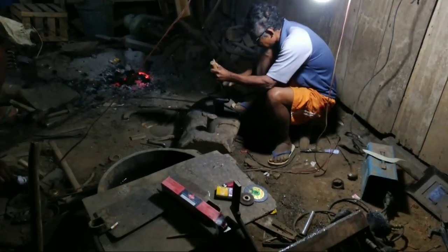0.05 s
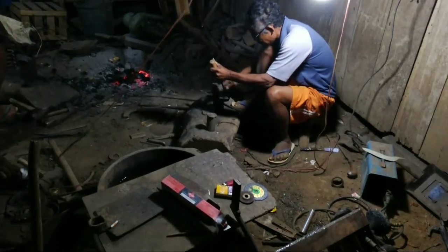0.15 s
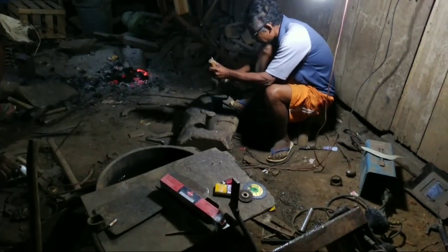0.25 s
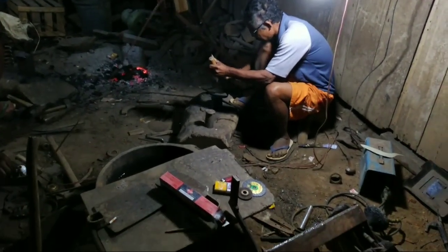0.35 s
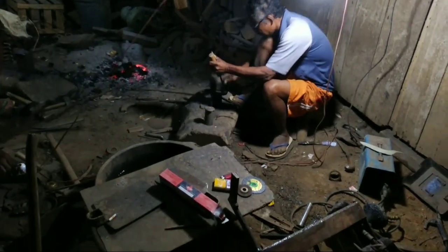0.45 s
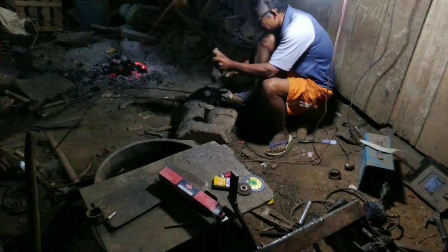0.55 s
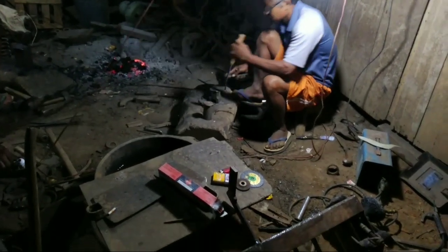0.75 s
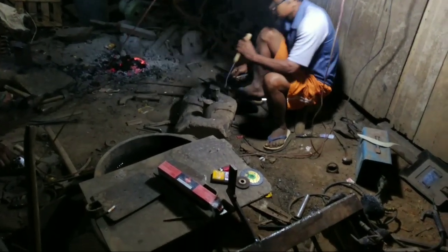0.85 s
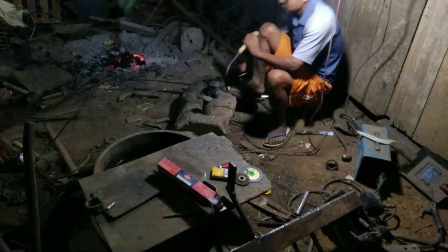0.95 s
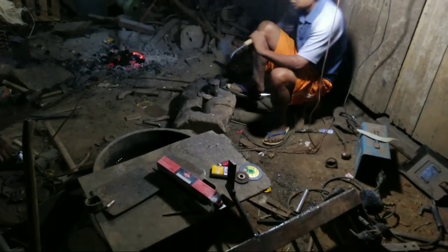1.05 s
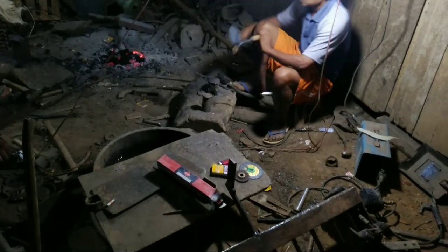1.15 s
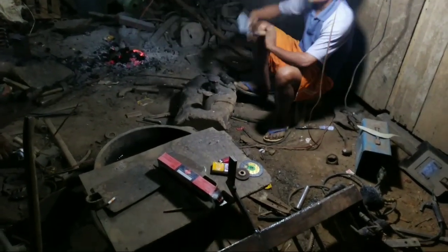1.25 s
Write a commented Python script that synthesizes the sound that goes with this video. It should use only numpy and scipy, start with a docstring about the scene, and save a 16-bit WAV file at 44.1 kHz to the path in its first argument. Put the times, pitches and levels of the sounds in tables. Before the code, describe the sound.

Hammer on hot iron over a small block anvil: a dying blow, two loud cracking strikes with short damped ring, light clicks, then a gritty metallic clank and soft knocks; small workshop, close overloaded microphone.

```python
"""A smith hammers hot iron on a small block anvil, close enough to overload the recorder.
Each blow sums a noise crack, a falling thud, decaying block and anvil partials, and room reflections.
Light clicks are short noise; the hammer put down clanks as partials, grit grains and a hollow note.
Knocks of tools as he gets up are noise bumps with a woody note.
Shaped noise gives the faint hiss with two thin bands and the low rumble of air."""
import sys
import numpy as np
from scipy import signal
from scipy.fft import rfft, irfft
from scipy.io import wavfile

SR = 44100
rng = np.random.default_rng(int(sys.argv[2]) if len(sys.argv) > 2 else 0)


def waveform_to_disk(signal):
    """Save audio, clipped to [-1, 1], as 16-bit WAV at the path in sys.argv[1]."""
    frames = np.transpose(np.atleast_2d(signal))
    scaled = np.clip(frames, -1, 1) * 32767
    samples = np.round(scaled).astype(np.int16)
    wavfile.write(sys.argv[1], SR, samples)


N = 57330
T = np.arange(SR * 3 // 5) / SR  # time axis of one event, s
CLICK_RISE_S, ECHO_RISE_S = 0.00014, 0.0036

# left-right likeness of the sound field: f/Hz, correlation
LIKENESS = [(30, 0.58), (120, 0.68), (350, 0.98), (700, .7), (1400, 0.084), (3000, 0), (15000, 0.022)]


def amp(db):
    """Decibels to gain."""
    return 10 ** (np.asarray(db) / 20)


def read(points, hz):
    """A table's value along a log-frequency axis."""
    f, value = np.transpose(points)
    return np.interp(np.log(hz + 1), np.log(f), value)


def add(mix, s, sound):
    """Mixes a sound in at time s; a negative time leaves only its remainder."""
    at = round(s * SR)
    sound = sound[..., max(-at, 0):]
    part = mix[:, max(at, 0):][:, :sound.shape[-1]]
    part += sound[..., :part.shape[1]]


def pan(db):
    """Left and right gains for a left-right level difference."""
    return amp(np.array([[.5], [-.5]]) * db)


def strike(rise_s, t60):
    """Envelope with a quick rise and an exponential decay, 60 dB in t60 seconds."""
    return (1 - np.exp(-T / rise_s)) * np.exp(-np.log(1000) * T / t60)


def noise(spectrum, size, tilt_db=0):
    """Stereo noise of unit RMS, coloured and partly correlated; tilt in dB per octave above 500 Hz."""
    # level difference: f/Hz, left-right/dB
    balance = [(30, 21), (120, 1.5), (400, 4.5), (700, 2), (1300, 0.5), (2400, 5.5), (4400, 6.5),
               (7000, 3.5), (9500, -12.5), (12000, 2.5), (15000, -3.5)]
    hz = np.fft.rfftfreq(size, 1 / SR)
    a, b = rfft(rng.standard_normal((2, size)))
    same = np.clip(read(LIKENESS, hz), -1, 1)
    z = np.array([a, same * a + np.sqrt(1 - same ** 2) * b]) * pan(read(balance, hz))
    colour_db = read(spectrum, hz) + tilt_db * np.log2(np.maximum(hz, 500) / 500)
    x = irfft(z * amp(colour_db), size)
    return x / np.sqrt(np.mean(x ** 2))


def room(spectrum, rise_s, tilt_db=0):
    """Dense reflections that die away band by band, leaving a faint slower tail."""
    # decay of the room: f/Hz, t60/s
    decay = [(100, 0.32), (400, 0.23), (1000, 0.25), (2800, 0.23), (7000, 0.21), (15000, 0.23)]
    late_db, late_t60 = -24, .5
    hz, t, z = signal.stft(noise(spectrum, len(T), tilt_db), SR, nperseg=256)
    early = np.exp(-np.log(1000) * t / read(decay, hz)[:, None])
    late = amp(late_db) * np.exp(-np.log(1000) * t / late_t60)
    tail = signal.istft(z * (early + late), SR, nperseg=256)[1][:, :len(T)]
    return tail * (1 - np.exp(-T / rise_s))


def mode(hz, rise_s, t60, spread=1):
    """One dying partial; the higher it is, the more reflections make it waver and the right channel lag."""
    waver_depth, waver_per_s = 0.72, 70
    phase = rng.uniform(0, 2 * np.pi)
    lag = spread * np.arccos(np.clip(read(LIKENESS, hz), -1, 1))
    steps = rng.standard_normal((2, 200)) + 1j * rng.standard_normal((2, 200))
    waver = np.array([np.interp(T * waver_per_s, np.arange(len(row)), row) for row in steps])
    depth = waver_depth * spread * hz / (hz + 1000)
    carrier = np.exp(1j * (2 * np.pi * hz * T + phase - np.array([[0], [lag]])))
    tone = (1 + depth * waver) / np.sqrt(1 + depth ** 2) * carrier
    return strike(rise_s, t60) * tone.imag


def blow(level_db, thud_db, tilt_db, body_db, sizzle_db):
    """Crack, thud, the knock of the block, a ring damped by the soft iron, and the room's answer."""
    # crack of the contact: f/Hz, level/dB per Hz
    crack_colour = [(100, 0), (500, -10), (1000, -5), (2000, -4.5), (3000, -0.5), (4500, -12.5),
                    (7500, -11), (10000, -18.5), (15000, -30)]
    # short knock of the anvil block: f/Hz, level/dB, t60/s
    block = [(677, -1.5, 0.04), (737.3, -2, 0.051), (810, -8, .03), (1048, -2, .03), (1145, -1.5, 0.041),
             (2025, -2.5, .04), (3320, -3.5, 0.027)]
    # ring of anvil and iron: f/Hz, level/dB, t60/s
    anvil = [(148.2, -12, .3), (342.5, -0.5, 0.23), (435.2, -4.5, 0.24), (725, -6.5, 0.31), (792, -7, .19),
             (1171, -9.5, 0.24), (1958, -4, 0.26), (2630, -21, 0.2), (2810, 0, 0.21), (2850, -7.5, 0.15),
             (3760, -19, .2), (4310, -3, 0.25), (6640, -12, .15), (9100, -16.5, .22)]
    # the room's answer: f/Hz, level/dB per Hz
    echo_colour = [(50, -12), (130, -14), (300, -4), (520, -3), (720, 1.5), (900, -3.5), (1120, -3),
                   (1330, -7.5), (1700, -3.5), (2000, -6.5), (2300, -4), (3000, -1), (4200, -6), (6800, -8),
                   (9500, -13.5), (11000, -26), (15000, -38.5)]
    crack_db, block_db, thud_base_db, ring_db, echo_db = -1, -1.5, -8.5, -18.5, -8.5
    contact_low_hz = 460  # the contact itself radiates little below this
    sizzle_hz = 10000  # the top-treble change is full from here up

    crack = amp(crack_db) * noise(crack_colour, len(T)) * strike(rise_s=0.00032, t60=0.031)
    body = sum(amp(db) * mode(hz, 0.0014, t60, spread=0.41) for hz, db, t60 in block)
    high_pass = signal.butter(2, contact_low_hz, "high", fs=SR, output="sos")
    contact = signal.sosfilt(high_pass, crack + amp(block_db + body_db) * body)
    push = amp(thud_base_db + thud_db) * thud()
    ring = sum(amp(db + tilt_db * np.log2(hz / 1500)) * mode(hz, 0.001, t60) for hz, db, t60 in anvil)
    ring = amp(ring_db) * pan(1.5) * ring
    bright = [(hz, db + sizzle_db * min(hz / sizzle_hz, 1) ** 2) for hz, db in echo_colour]
    echo = amp(echo_db) * room(bright, ECHO_RISE_S)
    return amp(level_db) * (contact + push + ring + echo)


def thud():
    """A short heavy push whose pitch drops as it passes through the anvil's bed."""
    top_hz, end_hz, fall_s, peak_s = 1482, 70, 0.00482, 0.0056
    hz = end_hz + (top_hz - end_hz) * np.exp(-T / fall_s)
    u = T / peak_s
    cycles = np.cumsum(hz) / SR + rng.random()
    return (u * np.exp(1 - u)) ** 2 * np.sin(2 * np.pi * cycles)


def set_down(clank_db, note_db, note_hz):
    """The steel head clanks, grinds on grit and rings; what it lands on gives a blurred hollow note."""
    # partials of the head: f/Hz, level/dB, t60/s, left-right/dB
    head_modes = [(2550, -3, 0.15, -6), (4610, -24, 0.44, -1), (4920, -19.5, 1, 11), (4900, 4, 0.14, 4),
                  (5210, -23.5, 1, 0), (6150, -6, 0.25, 5), (6900, -22.5, 1, -2), (7980, -18, .25, 2),
                  (8409, -6.5, 0.31, 3), (8930, -18, 0.3, 0), (9380, -3.5, 0.27, -17.5),
                  (9000, -24, 0.2, -12), (10200, -22, 0.098, -9)]
    # clank and grit: f/Hz, level/dB per Hz
    clank_colour = [(100, -8), (350, -9), (700, -2), (1400, -0.5), (2800, 3), (5500, -4.5), (8000, -1),
                    (10300, -0.5), (12000, -12), (15000, -18)]
    # blur of the note: multiple of note_hz, level/dB per Hz
    note_band = [(.4, -37), (.78, -15), (1, 3), (1.2, -3), (1.45, -14.5), (3, -44)]
    head_db, grit_db, clank_room_db, blur_db = -28, -22, -22.5, -9
    clank_rise_s, note_rise_s, note_t60 = 0.0015, 0.0023, 0.096
    grit_per_s, grit_t60, grain_t60 = 1400, 0.14, 0.0055

    head = sum(amp(db) * pan(side_db) * mode(hz, clank_rise_s, t60) for hz, db, t60, side_db in head_modes)
    grains = rng.standard_normal(len(T)) * (rng.random(len(T)) < grit_per_s / SR)
    crackle = signal.fftconvolve(grains, strike(CLICK_RISE_S, grain_t60))[:len(T)]
    grit = crackle * noise(clank_colour, len(T)) * strike(clank_rise_s, grit_t60)
    echo = room(clank_colour, clank_rise_s)
    clank = amp(head_db) * head + amp(grit_db) * grit + amp(clank_room_db) * echo
    blur = amp(blur_db) * room([(k * note_hz, db) for k, db in note_band], note_rise_s)
    note = mode(note_hz, note_rise_s, note_t60) + blur
    return amp(clank_db) * clank + amp(note_db) * note


def click(level_db, tilt_db, room_db, focus_hz):
    """A light touch of metal on metal, slightly lifted around one pitch, with its echo."""
    # colour of the touch: f/Hz, level/dB per Hz
    click_colour = [(150, -10), (600, -7), (1500, 1.5), (3000, 3), (4500, 0), (7000, -8.5), (10000, -13.5),
                    (15000, -36)]
    focus_db, focus_octaves = 0.5, .5
    hz = np.geomspace(100, 16000, 40)
    lift_db = focus_db * np.exp(-(np.log2(hz / focus_hz) / focus_octaves) ** 2)
    colour = np.c_[hz, read(click_colour, hz) + lift_db]
    touch = noise(colour, len(T), tilt_db) * strike(CLICK_RISE_S, t60=0.031)
    return amp(level_db) * (touch + amp(room_db) * room(colour, ECHO_RISE_S, tilt_db))


def knock(level_db, note_hz):
    """A dull bump with a short woody note and its echo."""
    # colour of the bump: f/Hz, level/dB per Hz
    knock_colour = [(60, 6), (160, 0), (280, 0.5), (450, -5.5), (650, 0.5), (950, 0.5), (1450, -10),
                    (1950, -6), (2800, -13), (10000, -34)]
    rise_s, bump_t60, note_t60, note_db, room_db = 0.00041, 0.058, .11, -4.5, -5.5
    bump = noise(knock_colour, len(T)) * strike(rise_s, bump_t60)
    note = amp(note_db) * mode(note_hz, rise_s, note_t60)
    echo = amp(room_db) * room(knock_colour, ECHO_RISE_S)
    return amp(level_db) * (bump + note + echo)


def thin_band(hz, width_hz):
    """Noise confined to a narrow peak, 10 dB down one width to either side."""
    peak = [(hz - 3 * width_hz, -70), (hz - width_hz, -10), (hz, 0),
            (hz + width_hz, -10), (hz + 3 * width_hz, -70)]
    return noise(peak, N)


def background():
    """Faint hiss with two thin bands standing out of it, over a low rumble that swells and sinks."""
    # hiss: f/Hz, level/dB per Hz
    hiss_colour = [(80, 18), (200, 0.5), (500, -3.5), (1400, -13), (2500, 4), (4500, 3), (6500, -4.5),
                   (9500, -15), (12000, -24), (15000, -41.5)]
    # thin bands in the hiss: f/Hz, width/Hz, level/dB
    whine = [(3410, 100, -60.5), (4480, 160, -61)]
    # rumble of air: f/Hz, level/dB per Hz
    rumble_colour = [(5, -5), (25, -5.5), (40, -10), (65, -12.5), (100, -19), (200, -38.5), (1000, -80.5)]
    # rumble's rise and fall: t/s, level/dB
    rumble_swell = [(0, -1), (0.25, -5), (0.39, 1.5), (0.549, -1.5), (0.798, -5.5), (0.9, -1.5),
                    (1.1, -1.5), (1.3, -0.5)]
    hiss_db, rumble_db = -48.5, -37
    bands = sum(amp(db) * thin_band(hz, width_hz) for hz, width_hz, db in whine)
    swell_db = np.interp(np.arange(N) / SR, *np.transpose(rumble_swell))
    rumble = amp(rumble_db + swell_db) * noise(rumble_colour, N)
    return amp(hiss_db) * noise(hiss_colour, N) + rumble + bands


def scene():
    """All the strikes over the workshop's background."""
    # hammer blows, the first already dying away:
    # t/s, level/dB, thud/dB, ring tilt/dB per octave, block/dB, top treble/dB
    blows = [(-0.07, 3, -10, 0.5, -7, -3.5), (0.2168, -1.5, -3, 0.5, 1.5, -3.5),
             (0.5277, -0.5, -2.5, 0, -6.5, 0.5)]
    # hammer put down and rocking to rest: t/s, clank/dB, hollow note/dB, note f/Hz
    set_downs = [(0.9894, 1, -21.5, 336.6), (1.024, -9, -26.5, 391), (1.057, -16, -24.5, 370),
                 (1.134, -40, -28, 353.8), (1.186, -26.5, -33, 378), (1.238, -43, -35, 384.5),
                 (1.284, -46, -32.5, 396)]
    # light clicks of iron, tongs and hammer: t/s, level/dB, tilt/dB per octave, room/dB, focus f/Hz
    clicks = [(0.1528, -28.5, 3, -7, 3900), (0.167, -37, -3.5, -8, 4000), (0.401, -44, 2, -12, 900),
              (0.4147, -22.5, -2.5, -6, 1300), (0.428, -26.5, -3, -7, 2700), (0.66, -34, 5, -8, 5000),
              (0.7137, -34.5, 6, -12.5, 8500), (0.860, -37, 5, -3.5, 4000),
              (0.9717, -36.5, -0.5, 2.5, 9000), (0.976, -24, 9.5, -10, 9140),
              (1.1192, -37.5, 5.5, -0.5, 9700)]
    # dull knocks and shuffles, most as he rises: t/s, level/dB, note f/Hz
    knocks = [(0.186, -37.5, 910), (0.4021, -38.5, 794), (0.735, -44.5, 788), (1.092, -43, 863),
              (1.1188, -32, 1143), (1.183, -38.5, 1172), (1.219, -37.5, 1164), (1.2387, -31.5, 875),
              (1.283, -39, 677)]
    mix = background()
    for source, table in ((blow, blows), (set_down, set_downs), (click, clicks), (knock, knocks)):
        for s, *row in table:
            add(mix, s, source(*row))
    return mix


def record(dry):
    """The loudest peaks overload the recorder, a soft-kneed ceiling; then the band limit."""
    ceiling, knee, edge_hz = 1.0, 6, 15700
    clipped = dry / (1 + abs(dry / ceiling) ** knee) ** (1 / knee)
    low_pass = signal.firwin(511, edge_hz, window=("kaiser", 9), fs=SR)
    return signal.oaconvolve(clipped, low_pass[None], "same")


dry = scene()
out = record(dry)
waveform_to_disk(out)
```